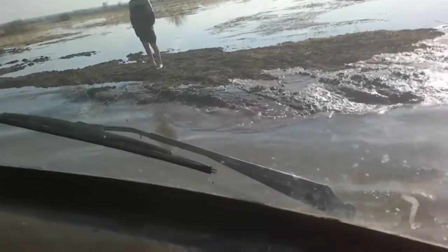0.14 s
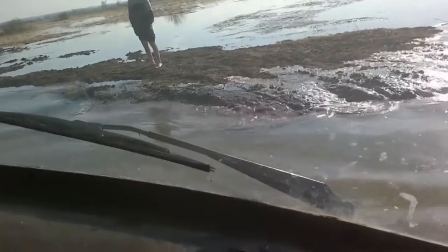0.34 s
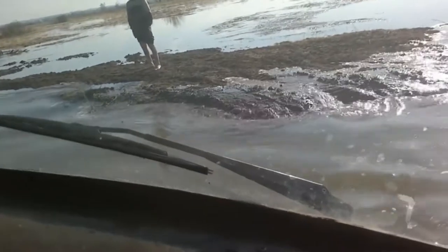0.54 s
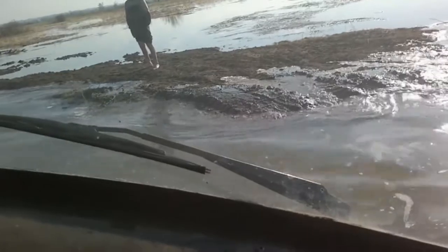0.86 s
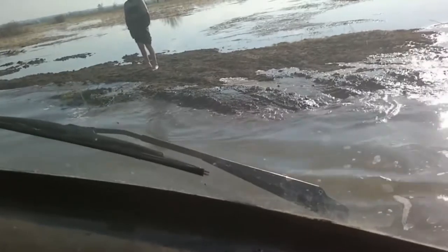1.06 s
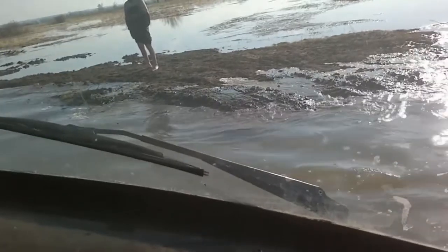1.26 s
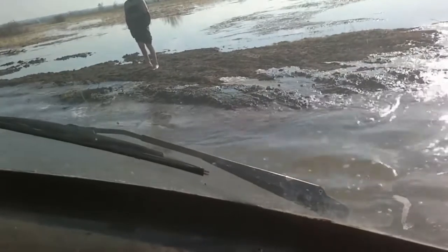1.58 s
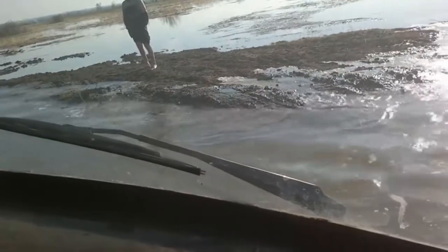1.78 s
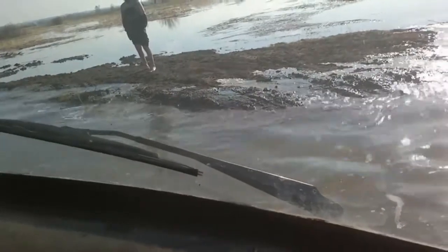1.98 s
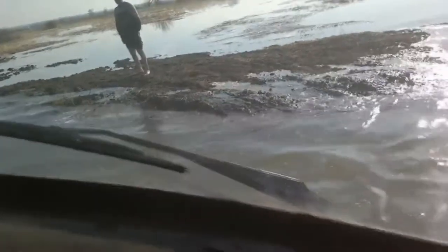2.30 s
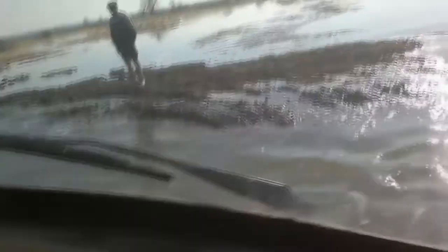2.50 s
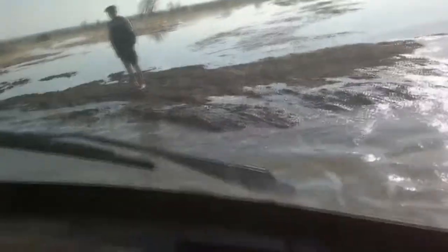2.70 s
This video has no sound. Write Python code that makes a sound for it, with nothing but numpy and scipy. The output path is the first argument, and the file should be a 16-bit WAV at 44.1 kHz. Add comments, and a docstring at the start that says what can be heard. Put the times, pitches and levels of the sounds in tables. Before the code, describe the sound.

A four-cylinder van engine heard close inside the cab: a quick rev up, a booming sag, then a second, higher and rougher rev with fan whine, intake hiss and dull body thuds near the end.

```python
"""A four-cylinder engine is revved twice, heard inside the cab of a van that fights through deep water.
Sines locked to the firing order make a clean boom, a bark at twice its rate and wavering other orders.
A belt-driven fan adds blade tones that trail the engine; shaped noise makes the low rumble, the
engine-bay roar through the floor and the intake hiss on throttle, with a brief early whistle.
A few jolts thud through the body as soft blows that ring four damped modes."""
import sys
import numpy as np
from scipy import signal
from scipy.fft import rfft, irfft
from scipy.io import wavfile
from scipy.ndimage import uniform_filter1d

SR = 44100
rng = np.random.default_rng(int(sys.argv[2]) if len(sys.argv) > 2 else 0)


def level_to_linear(level):
    """Convert decibel levels to linear amplitude factors, elementwise."""
    exponent = np.asarray(level, float) / 20
    return 10 ** exponent


def transcribe(signal):
    """Save signal, clipped to [-1, 1], as a 16-bit WAV file at the path in sys.argv[1]."""
    frames = np.atleast_2d(signal).T
    limited = np.clip(frames, -1, 1)
    pcm = np.round(limited * 32767).astype(np.int16)
    wavfile.write(sys.argv[1], SR, pcm)


N = 125685


def rms_one(x):
    """Scale to unit rms."""
    return x / np.sqrt(np.mean(x ** 2) + 1e-20)


def in_time(rows):
    """Draw the columns of a table, whose first is seconds, as curves over every sample."""
    seconds, *columns = np.transpose(rows)
    return [np.interp(np.arange(N) / SR, seconds, column) for column in columns]


def drift(rate_hz):
    """Slow random wander of unit rms: noise through two equal poles at rate_hz."""
    step = 40  # samples between the points of the wander
    warm_up = 2000
    pole = np.exp(-2 * np.pi * rate_hz * step / SR)
    noise = rng.standard_normal(N // step + warm_up + 2)
    slow = signal.lfilter([1], [1, -2 * pole, pole * pole], noise)[warm_up:]
    return np.interp(np.arange(N) / step, np.arange(len(slow)), rms_one(slow))


def trail(x, seconds):
    """A one-pole lag that starts settled on the first value."""
    pole = np.exp(-1 / (seconds * SR))
    return signal.lfilter([1 - pole], [1, -pole], x - x[0]) + x[0]


def coloured(points, peaks, patchy_db):
    """Noise with a spectrum and resonances, in octave bands that each flicker; rms 1."""
    hz = np.maximum(np.arange(N // 2 + 1) * SR / N, 1)
    point_hz, point_db = np.transpose(points)
    shape = level_to_linear(np.interp(np.log(hz), np.log(point_hz), point_db, left=-90, right=-90))
    for centre_hz, width_hz, gain_db in peaks:
        shape = shape * level_to_linear(gain_db / (1 + (2 * (hz - centre_hz) / width_hz) ** 2))
    spectrum = rfft(rng.standard_normal(N)) * shape
    out = 0
    for octave in range(4, 15):  # bands centred on 2 ** octave Hz, crossfading into each other
        share = np.clip(1 - np.abs(np.log2(hz) - octave), 0, 1)
        out = out + irfft(spectrum * share, N) * level_to_linear(patchy_db * drift(6.8))
    return rms_one(out)


def low_rumble():
    """Low noise under the engine, patchy from octave to octave, that swells and sinks."""
    # Loudness of the rumble. Each row: time in seconds, level in dB.
    rumble_level = [(0, -42.5), (.15, -27.5), (.3, -27), (.6, -31.5), (.9, -39), (1.2, -35), (1.5, -38.5),
                    (1.7, -33), (1.82, -33.5), (2.0, -25), (2.2, -27.5), (2.33, -21.5), (2.5, -30.5),
                    (2.7, -18.5), (2.85, -29)]
    # Spectrum of the rumble. Each row: frequency in Hz, relative level in dB per Hz.
    rumble_spectrum = [(20, -8), (35, 0), (55, -2), (80, 0.5), (120, -8.5), (200, -4.5), (280, -5.5),
                       (330, -28.5), (500, -18.5)]
    level_db, = in_time(rumble_level)
    return level_to_linear(level_db) * coloured(rumble_spectrum, [], patchy_db=3.0)


def engine_bay_roar(firings, roar_db):
    """Engine-bay noise through the floor, coloured by cab panels and pulsing with each firing."""
    # Spectrum of the roar. Each row: frequency in Hz, relative level in dB per Hz.
    roar_spectrum = [(190, -28.5), (320, -7.5), (500, -11), (700, -12.5), (1100, -13), (1750, -14),
                     (2150, -18.5), (2350, -31), (3100, -30.5), (4200, -36.5), (6000, -45), (8000, -52),
                     (11000, -77.5)]
    # Panel resonances of the cab. Each row: frequency in Hz, width in Hz, gain in dB.
    panels = [(396, 13, 2), (829, 140, 6.5), (1299, 60, 4.5), (1406, 23, 8), (1720, 50, 6),
              (2920, 900, 1.5), (3720, 130, -6)]
    trim_db = 0.78
    firing_gate = 0.088  # depth of the pulse as a share of the roar
    gate = 1 + firing_gate * np.cos(2 * np.pi * firings)
    return level_to_linear(roar_db + trim_db) * gate * coloured(roar_spectrum, panels, patchy_db=0.5)


def body_jolts():
    """Low-passed blows into damped body modes; the softest mostly heave the whole shell."""
    # Blows to the body. Each row: time in seconds, strength in dB, softness as a low-pass in Hz.
    blows = [(2.262, -22.5, 300.9), (2.657, -12.5, 249.3), (2.672, -9, 307.9), (2.707, -20, 69.6),
             (2.728, -5.5, 68.6), (2.75, -22.5, 298)]
    # Modes of the body. Each row: frequency in Hz, drive in dB, time to ring down by 60 dB in seconds.
    body_modes = [(42.6, -1.5, 0.41), (191, 5, 0.05), (262.4, -3, 0.14), (440, -9, 0.031)]
    thuds, out = 0, 0
    for start_s, db, soft_hz in blows:
        blow = level_to_linear(db) * (np.arange(N) == int(start_s * SR)) + 1e-18
        thuds = thuds + signal.lfilter(*signal.butter(2, soft_hz, fs=SR), blow)
    for hz, db, t60_s in body_modes:
        pole = level_to_linear(-60 / (t60_s * SR))
        angle = 2 * np.pi * hz / SR
        feedback = [1, -2 * pole * np.cos(angle), pole * pole]
        out = out + signal.lfilter([0, level_to_linear(db) * np.sin(angle)], feedback, thuds)
    return out


def intake(firings, firing_hz, hiss_db):
    """Air noise through the throttle: hiss and a brief whistle, chuffing most at low speed."""
    # Spectrum of the hiss. Each row: frequency in Hz, relative level in dB per Hz.
    hiss_spectrum = [(1800, -20), (2500, 5), (3700, -9.5), (5000, 1.5), (6800, -2), (9000, -1),
                     (10500, -2.5), (12500, -8), (15000, -20), (16000, -45.5)]
    # Resonances of the hiss. Each row: frequency in Hz, width in Hz, gain in dB.
    hiss_peaks = [(2790, 600, 6), (3780, 450, 16), (5130, 200, 2), (7600, 400, 3), (8870, 150, 6),
                  (10900, 300, -1)]
    # Spectrum of the whistle. Each row: frequency in Hz, relative level in dB per Hz.
    whistle_spectrum = [(4300, -22), (5200, 0), (6000, -2), (6800, -3.5), (7600, -27)]
    trim_db, sputter_db = 1.5, 1.3
    chuff_depth_db, chuff_full_hz = 5, 40  # full depth up to this firing rate, less above
    treble_hz, treble_follows, treble_full_db = 8200, 1.3, -60
    whistle_s, whistle_half_s, whistle_db = 0.11, 0.04, -63  # level at its peak, before the chuff

    hiss = level_to_linear(hiss_db + trim_db + sputter_db * drift(28))
    hiss = hiss * coloured(hiss_spectrum, hiss_peaks, patchy_db=1.54)
    # Below full flow the top of the hiss fades faster than the rest.
    dull = signal.sosfiltfilt(signal.butter(4, treble_hz, fs=SR, output="sos"), hiss)
    treble_db = treble_follows * np.minimum(hiss_db - treble_full_db, 0)
    hiss = dull + level_to_linear(treble_db) * (hiss - dull)

    swell = np.exp(-((np.arange(N) / SR - whistle_s) / whistle_half_s) ** 2)
    whistle = level_to_linear(whistle_db) * swell * coloured(whistle_spectrum, [], patchy_db=1.5)

    chuff_share = np.minimum(chuff_full_hz / firing_hz, 1) ** 2
    chuff_db = chuff_depth_db * chuff_share * np.cos(2 * np.pi * firings)
    return level_to_linear(chuff_db) * (hiss + whistle)


def fan_whine(firing_hz, roar_db):
    """Blade tones on a belt that trails the engine and slips when the speed changes."""
    # Blade tones. Each row: multiple of the lagged firing rate, level in dB before path and swell.
    blade_tones = [(5.2, -44.5), (10.4, -47), (20.8, -53.5)]
    # How well the cab passes the blade tones. Each row: frequency in Hz, gain in dB.
    cab_path = [(180, 10), (250, -10.5), (280, 6.5), (310, 3.5), (350, -3.5), (400, -3), (430, 3.5),
                (500, -6.5), (540, 1), (600, -7.5), (700, -10.5), (830, 1.5), (1050, -2), (1300, -6.5),
                (1800, -11.5)]
    lag_s, follows_roar, wander_db = 0.01187, 0.36, 2.0
    slip_db = 0.06  # loss per Hz/s of speed change
    speed_hz = trail(firing_hz, lag_s)
    turns = np.cumsum(speed_hz) / SR
    speed_change = trail(np.abs(np.gradient(speed_hz)) * SR, 0.03)
    swell_db = follows_roar * (roar_db - roar_db.mean()) - slip_db * speed_change
    out = 0
    for multiple, db in blade_tones:
        path_db = np.interp(multiple * speed_hz, *np.transpose(cab_path))
        level = level_to_linear(db + path_db + swell_db + wander_db * drift(2.6))
        out = out + level * np.sin(2 * np.pi * multiple * turns + 0.14 * drift(7.3))
    return np.sqrt(2) * out  # sine peaks raised so that levels are rms


def engine_orders(firings, boom_db, bark_db):
    """Clean boom at the firing rate, bark at twice it, and wavering half and upper orders."""
    # Other orders, riding on the bark. Each row: multiple of the firing rate, dB against the bark.
    other_orders = [(.5, -9.5), (1.5, -15), (2.5, -14), (3, -10), (3.5, -20.5), (4, -29.5), (4.5, -46.5),
                    (5, -26.5), (6, -32), (7, -31.5)]
    boom_wander_db = 0.4
    bark_wander_db, bark_wander_rad = 1.0, 0.3
    order_wander_db, order_wander_rad = 3.0, 0.5
    bark_smooth_s = 0.18

    boom = level_to_linear(boom_db + boom_wander_db * drift(24)) * np.sin(2 * np.pi * firings)
    bark_level = level_to_linear(bark_db + bark_wander_db * drift(11))
    bark = bark_level * np.sin(4 * np.pi * firings + bark_wander_rad * drift(6))
    out = boom + bark
    load_db = uniform_filter1d(bark_db, int(bark_smooth_s * SR) + 1)
    for multiple, db in other_orders:
        level = level_to_linear(load_db + db + order_wander_db * drift(8.1))
        phase = 2 * np.pi * (multiple * firings + rng.random())
        out = out + level * np.sin(phase + order_wander_rad * drift(6))
    return np.sqrt(2) * out  # sine peaks raised so that levels are rms


def scene():
    """One engine speed drives the orders, fan, intake and roar; all reach one microphone in the cab."""
    # The revs. Each row: time in seconds, firing rate in Hz, level of the boom in dB,
    # level of the bark in dB.
    engine_revs = [(0, 32.9, -31, -17), (.08, 35.48, -17, -23), (.16, 42.8, -18.5, -23),
                   (.22, 50.3, -12.5, -29), (.27, 55.2, -14.5, -20), (.31, 59.5, -6, -28),
                   (.34, 63.3, -10, -39.5), (.39, 68.8, -17, -37.5), (.46, 63.2, -10, -34.5),
                   (.54, 60.47, -10.5, -37.5), (.66, 57.4, -9, -36), (.79, 54.54, -6.5, -35),
                   (.86, 53.47, -8, -30.5), (.95, 51.1, -13, -43), (1.07, 49.9, -13.5, -42),
                   (1.14, 50.8, -15.5, -36), (1.26, 54.3, -11, -37), (1.42, 52.5, -12, -43.5),
                   (1.54, 49.8, -16.5, -38.5), (1.61, 53.45, -13, -31.5), (1.67, 58.45, -11, -29),
                   (1.72, 63.33, -18.5, -32), (1.77, 69.95, -28.5, -30), (1.81, 71.5, -38, -46),
                   (1.86, 71.35, -19, -42), (1.92, 69.57, -15.5, -33.5), (1.97, 69.5, -17.5, -27),
                   (2.02, 72.14, -26, -31), (2.08, 74.23, -23, -26.5), (2.14, 79.1, -21.5, -36.5),
                   (2.2, 77.96, -47, -48), (2.24, 78, -31, -34), (2.28, 78.26, -22.5, -23.5),
                   (2.32, 78.8, -17, -20), (2.42, 81.66, -21.5, -17), (2.55, 83.32, -19, -20),
                   (2.64, 80.67, -25, -16), (2.7, 79.8, -20, -22.5), (2.75, 79.6, -21.5, -19),
                   (2.85, 83.07, -18.5, -16)]
    # The load. Each row: time in seconds, roar level in dB before its trim,
    # hiss level in dB before its trim.
    engine_load = [(0.04, -47.5, -101), (0.08, -47, -69), (0.19, -43, -58.5), (0.2, -43.5, -54),
                   (0.34, -38, -55.5), (0.42, -39.5, -69.5), (0.62, -41, -66), (0.68, -42, -82),
                   (1.0, -46, -81), (1.19, -47.5, -70), (1.2, -43.5, -70.5), (1.26, -46, -88),
                   (1.28, -46, -86.5), (1.54, -49.5, -74), (1.66, -44, -57), (1.85, -39, -65.5),
                   (1.98, -40, -61.5), (2.0, -39, -58), (2.11, -37, -57.5), (2.2, -35, -59),
                   (2.23, -33, -63.5), (2.25, -36, -58), (2.38, -31, -49.5), (2.44, -34, -52.5),
                   (2.5, -33, -52), (2.81, -33.5, -54)]
    firing_hz, boom_db, bark_db = in_time(engine_revs)
    roar_db, hiss_db = in_time(engine_load)
    firings = np.cumsum(firing_hz) / SR  # running count of firings

    mix = low_rumble()
    mix = mix + engine_bay_roar(firings, roar_db)
    mix = mix + body_jolts()
    mix = mix + intake(firings, firing_hz, hiss_db)
    mix = mix + fan_whine(firing_hz, roar_db)
    mix = mix + engine_orders(firings, boom_db, bark_db)
    return mix[None]


def top_cut(x):
    """Nothing passes above the cut-off."""
    return signal.sosfilt(signal.butter(12, 15700, fs=SR, output="sos"), x)


def record(dry):
    """Turn the finished mix into the delivered sound."""
    return top_cut(dry)


dry = scene()
out = record(dry)
transcribe(out)
```